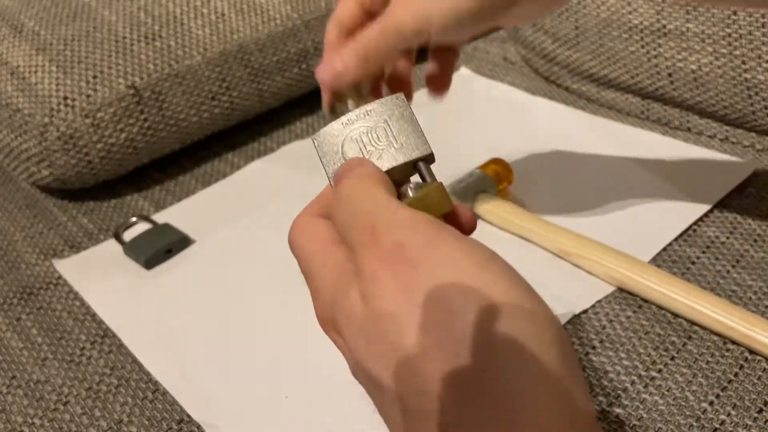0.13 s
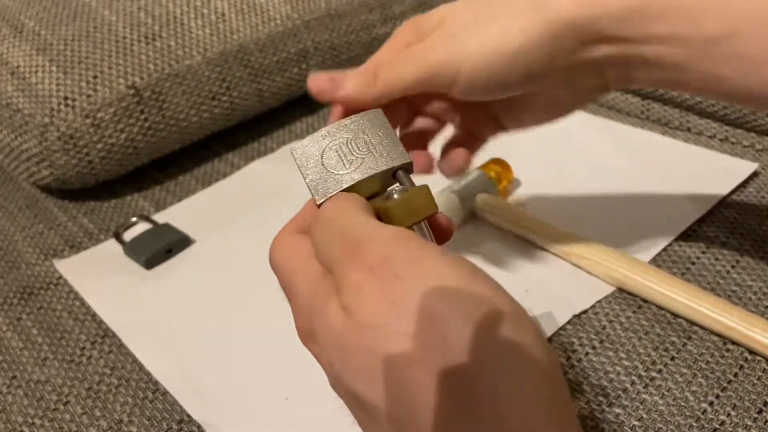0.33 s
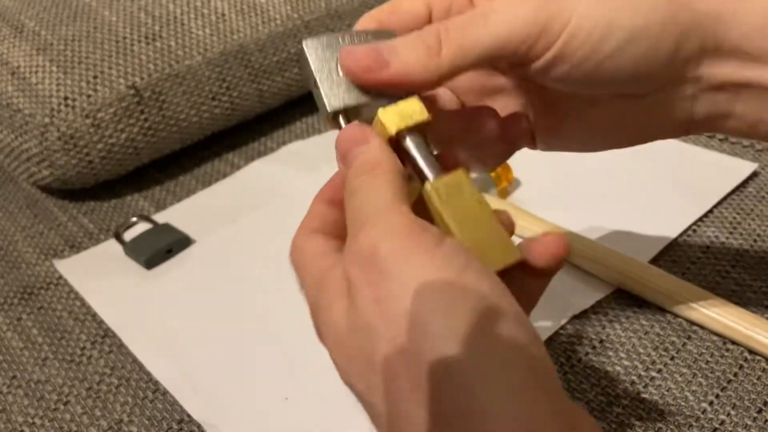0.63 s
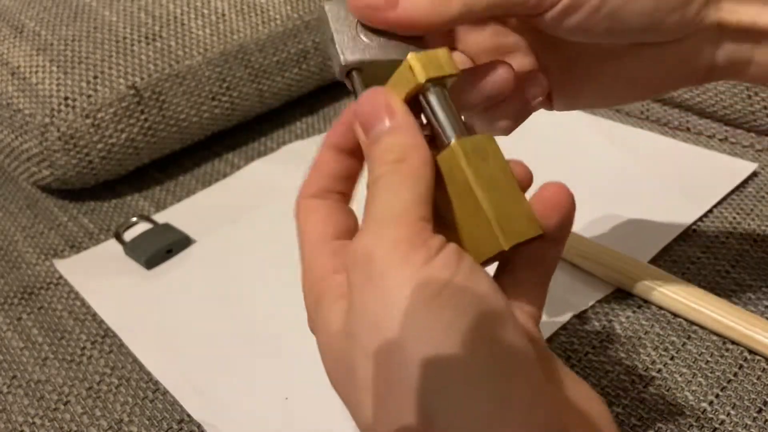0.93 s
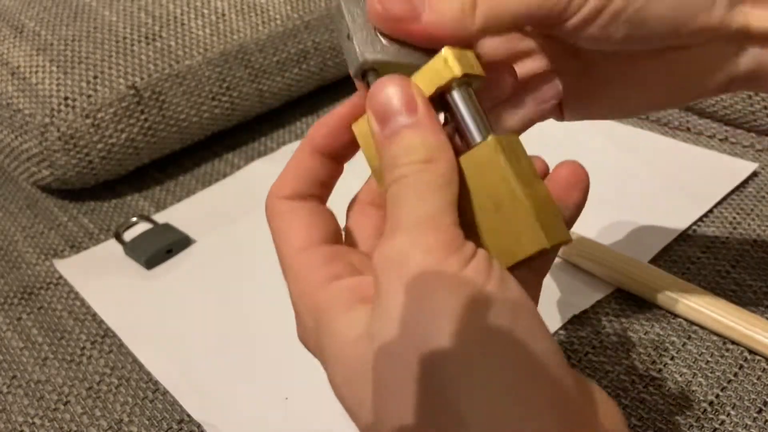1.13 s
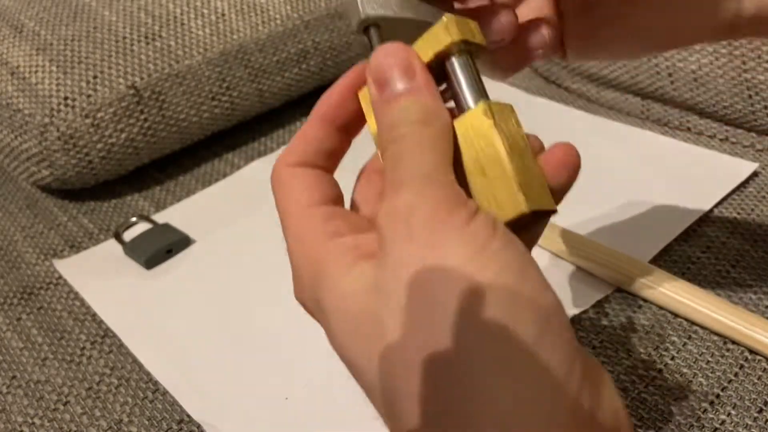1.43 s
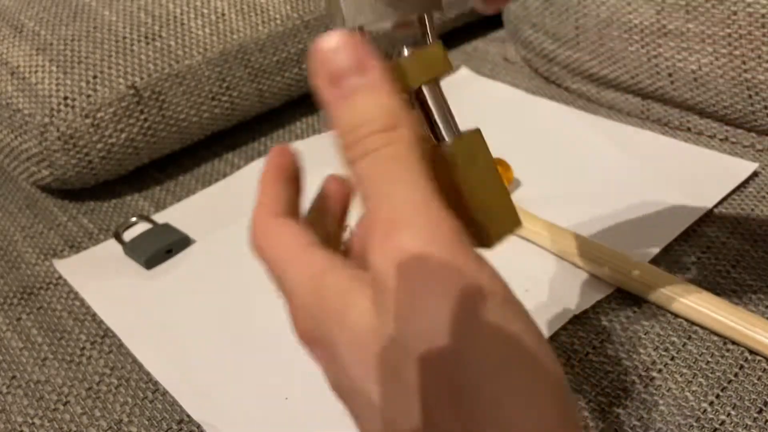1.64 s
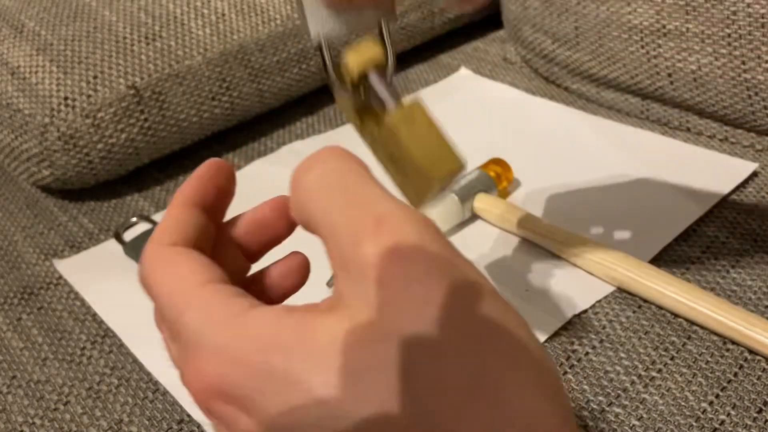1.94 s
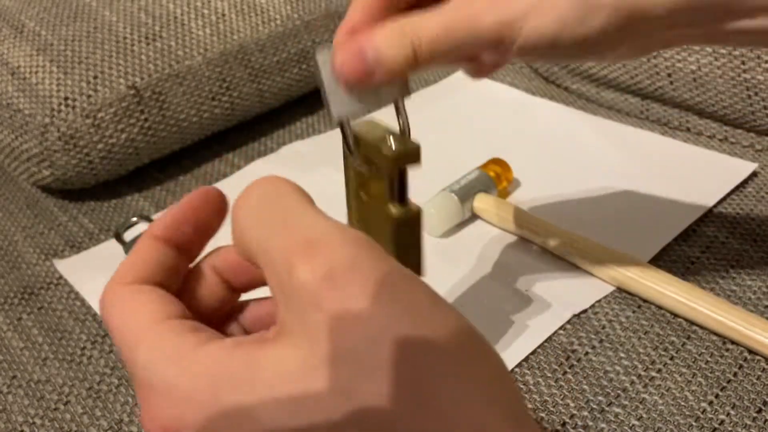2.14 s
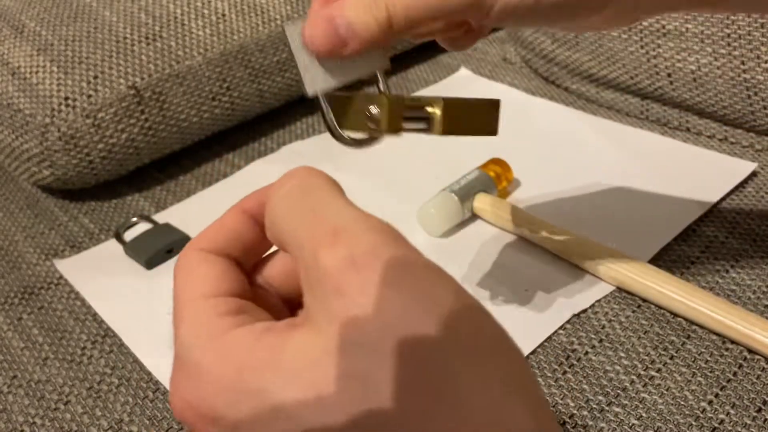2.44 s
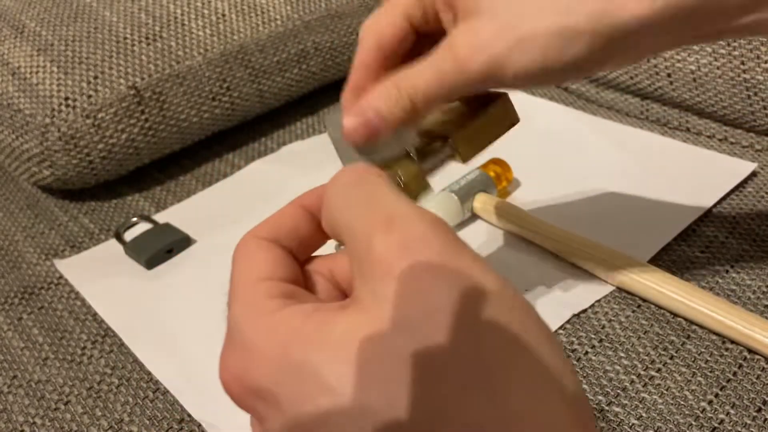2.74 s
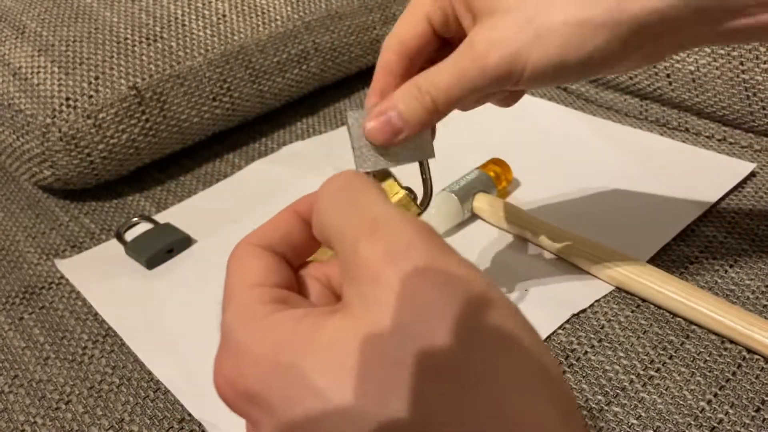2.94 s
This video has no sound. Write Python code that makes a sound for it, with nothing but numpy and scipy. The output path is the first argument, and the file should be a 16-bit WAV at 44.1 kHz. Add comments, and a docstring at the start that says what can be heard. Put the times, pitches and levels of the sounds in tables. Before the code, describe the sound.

Small brass and steel padlocks: a dull padded thud with a thin high metal ring, faint ticks while handled, then bright irregular clacks and fine jostling as they dangle; close stereo microphone, quiet living room.

```python
"""A chain of small brass and steel padlocks is handled over a sofa, close to a stereo microphone in a living room.
First something lands with a dull thud and a thin metal ring: padded knocks, booms and very high modes.
Then the locks tick in the fingers, and later they dangle and clack together over fine metallic jostling.
Each contact is a snap with a short chatter that rings lock bodies and shackles; some add a lower clank.
Grainy rubbing noise, a diffuse room tail and a quiet rumble with hiss and hum lie around the metal."""
import sys
import numpy as np
from scipy import signal
from scipy.fft import rfft, irfft, next_fast_len
from scipy.io import wavfile
from scipy.ndimage import uniform_filter1d, map_coordinates

SR = 44100
rng = np.random.default_rng(int(sys.argv[2]) if len(sys.argv) > 2 else 0)


def unload_wav(signal):
    """Save mono or channel-first audio to the path in sys.argv[1] as 16-bit WAV at rate SR, clipped to [-1, 1]."""
    wavfile.write(
        sys.argv[1],
        SR,
        np.round(np.clip(np.atleast_2d(signal).T, -1, 1) * 32767).astype(np.int16),
    )


N = 136710  # length in samples
T = np.arange(SR // 5) / SR  # time axis of one short sound, in seconds
LEAD_IN_S = .003  # room ahead of a blow, for the onset of its evened spectrum
RING_DRIVE_S = 0.0074  # t60 of the chatter that feeds the lock and clank modes
ROOM_DELAY_S = .004  # the room answers this long after the direct sound


def amp(db):
    """Decibels to gain."""
    return 10 ** (np.asarray(db) / 20)


def unit(x):
    """Scale to rms 1."""
    return x / np.sqrt(np.mean(x ** 2) + 1e-20)


def one_joule(x):
    """Scale to energy 1, the sum of squared samples."""
    return x / np.sqrt(np.sum(x ** 2) + 1e-20)


def along(points, hz):
    """Read a curve of (Hz, value) points on a log frequency axis."""
    f, v = np.transpose(points)
    return np.interp(np.log(hz + 1), np.log(f + 1), v)


def fade(t, t60):
    """Exponential decay that falls 60 dB in t60 seconds."""
    return np.exp(-np.minimum(np.log(1000) * t / np.maximum(t60, 1e-4), 60))


def add(track, s, sound):
    """Mix a sound into the track at s seconds, cut at the end of the track."""
    part = track[..., max(round(s * SR), 0):][..., :sound.shape[-1]]
    part += sound[..., :part.shape[-1]]


def filtered(x, response):
    """Multiply the spectrum of x by a response of frequency."""
    n = x.shape[-1]
    m = next_fast_len(n + SR // 8)
    return irfft(rfft(x, m) * response(np.fft.rfftfreq(m, 1 / SR)), m)[..., :n]


def coloured(x, points, size=4096):
    """Causal minimum-phase filter with the given (Hz, dB) gain, so that an onset stays sharp."""
    gain = amp(along(points, np.fft.rfftfreq(size, 1 / SR)))
    cepstrum = irfft(np.log(gain))
    # folding the cepstrum onto positive time gives minimum phase
    cepstrum[1:size // 2] *= 2
    cepstrum[size // 2 + 1:] = 0
    impulse = irfft(np.exp(rfft(cepstrum)))
    return signal.fftconvolve(x, impulse)[:len(x)]


def evened(x, width_hz, size=2048):
    """A short blow after a brief lead-in, with spectral ripples wider than width_hz evened out."""
    z = rfft(np.pad(x, (round(LEAD_IN_S * SR), 0))[:size])
    bins = max(int(width_hz * size / SR), 1)
    power = abs(uniform_filter1d(abs(z) ** 2, bins))
    return one_joule(irfft(z / np.sqrt(power + 1e-9 * power.max()), size))


def burst(t60):
    """Dying noise of energy 1."""
    return one_joule(rng.standard_normal(len(T)) * fade(T, t60))


def ring(modes, drive_s, detune, scatter_db=3.0):
    """Damped modes fed by a brief chatter; grip and contact point vary them a little."""
    out = np.zeros(len(T))
    for hz, db, t60 in modes:
        mode_hz = hz * (1 + detune * rng.normal())
        pole = fade(1 / SR, t60) * np.exp(2j * np.pi * mode_hz / SR)
        swing = signal.lfilter([1], [1, -pole], burst(drive_s)).real
        out += amp(db + scatter_db * rng.normal()) * one_joule(swing)
    return out


def contacts():
    """Metal strikes metal: a snap and its chatter, with the ring of lock body and shackle."""
    # Each row: start in seconds, contact levels in dB at four frequencies from low to high,
    # body ring in dB, shackle ring in dB, chatter t60 in seconds
    hits = [(0.094, -45.5, -40, -25.5, -25.5, -34, -40.5, 0.009),
            (0.23, 4.5, -5, -15.5, -12, -17, -24.5, 0.0064), (0.2607, 5, 5, -20, 0.5, 17, -11.5, 0.01),
            (0.2787, -6, -13, -22.5, -10.5, 7.5, -21, 0.016), (0.331, -12.5, -26, -24, -7, -20, -48, 0.029),
            (0.4, -20.5, -15, -21.5, -19.5, -17, -34, 0.034), (0.482, -16, -28.5, -44, -34, -27, -51, 0.03),
            (0.5535, -42, -24, -25, -31, -36, -41, 0.0094), (0.57, -20.5, -12, -8, -9, -24.5, -28, 0.0069),
            (0.8852, -32, -32, -29, -34, -19, -57.5, 0.014),
            (1.1043, -32, -41, -36.5, -17, -47.5, -18, 0.004),
            (1.1225, -35.5, -36.5, -31.5, -25, -42.5, -45, 0.0011),
            (1.177, -28.5, -29.5, -23.5, -31, -34.5, -47, 0.0094),
            (1.324, -18, -6, -0.5, 6.5, -5.5, -4, 0.01), (1.331, -41, -33, -7, -19.5, -5, -28.5, 0.014),
            (1.3404, -35, -16.5, -15, -9, 0, -13, 0.0077), (1.5398, -17, -16, -27.5, -23.5, -10, -30, 0.12),
            (1.554, -27, -12, 4, -2.5, -22, 9, 0.0079), (1.7478, -13.5, -6, 6.5, -11.5, 12, 0, 0.021),
            (1.751, -4, -2, -2.5, -4.5, 5, -19.5, 0.011), (1.7568, -10, -12, -6.5, 2.5, 13.5, 2.5, 0.012),
            (1.7938, -29, -14, -11, -13.5, -21, -11.5, 0.0095), (1.8043, -8, 5.5, 9, 10, 17, 22, 0.0055),
            (1.84, -25, -18, -7, -4.5, -1, 1.5, 0.0036), (2.0187, -7.5, -9, -1.5, -4, 5, 8.5, 0.016),
            (2.0226, -31, -11.5, -4.5, -0.5, -11, 4, 0.0034),
            (2.0341, -13, -27, -10.5, -15, -9, -3, 0.0071),
            (2.061, -14.5, -8.5, -8.5, -12, -9, -15.5, 0.012), (2.073, -43.5, -26, -25, 3.5, 6, 4, 0.0037),
            (2.0789, -11, -16, 0, -3.5, 16.5, 8.5, 0.015), (2.2089, -26.5, -9, -1.5, 5, -13, -7, 0.0054),
            (2.259, -7, 0, -2.5, -11, 4.5, 6, 0.018), (2.3049, -1.5, -1.5, -3, -6, 2, 10.5, 0.007),
            (2.3464, -40.5, -12.5, -1.5, 0, -13.5, 4.5, 0.008), (2.4066, -8, 2, -2, -4.5, 5.5, 17, 0.01),
            (2.444, -9, 4.5, -2.5, 2, 15.5, -16, 0.026),
            (2.5243, -20, -20.5, -1.5, -5.5, -15.5, 4.5, 0.0045),
            (2.567, -7, -8, -8.5, -16.5, -10, 5, 0.036), (2.574, -22, -19, -2.5, -13.5, 9.5, 6.5, 0.022),
            (2.596, -3.5, -1, 10, -1, 3.5, 21.5, 0.014), (2.7222, -5.5, 1.5, -5.5, -15, 2, 4, 0.0064),
            (2.726, -31, -37, -18.5, -12, -21, -20, 0.036), (2.7364, -27.5, -3, -17, -13.5, 2, -24, 0.0151),
            (2.7738, -41, -40.5, -11, -8.5, -3, -20, 0.009),
            (2.8048, -19, -7.5, -14.5, -6, 7.5, -3, 0.0293), (2.8082, -19.5, -5.5, -9, -16, -29, -4, 0.024),
            (2.8484, -13.5, -14, -3.5, -2.5, -18.5, -11, 0.0056),
            (2.881, -12.5, -20.5, -28, -21.5, -34, -36, 0.0175),
            (3.024, -25.5, -28, -22, -28, -14, -11, 0.00463)]
    # Where the four levels hold, in Hz
    level_hz = [1100, 3200, 8000, 13000]
    # Lowest and highest corner of the contact colour, in Hz
    edges_hz = (200, 15300)
    # Lock body modes. Each row: frequency in Hz, energy in dB, t60 in seconds
    body_modes = [(3085, -39, .03), (4550, -30, .012), (4780, -23, .014), (4920, -19, .016),
                  (4845, -39, .1), (5015, -35, .07), (5230, -27, .025), (5265, -39, .13)]
    # Shackle modes. Each row: frequency in Hz, energy in dB, t60 in seconds
    shackle_modes = [(8650, -28, .012), (13110, -22, .012), (13175, -31, .22), (13260, -35, .12)]
    bass_db, top_edge_db = -14, 2  # edge corners, against the lowest and highest level
    snap_t60_s, snap_db = .002, 2  # the first snap, its energy against the chatter
    rise_s = .00018  # time constant of the attack
    bass_hz, edge_hz = edges_hz
    for s, low, mid, treble, top, body_db, shackle_db, chatter_s in hits:
        levels = zip(level_hz, (low, mid, treble, top))
        colour = [(bass_hz, low + bass_db), *levels, (edge_hz, top + top_edge_db)]
        snap = amp(snap_db) * burst(snap_t60_s)
        blow = (snap + burst(chatter_s)) * (1 - np.exp(-T / rise_s))
        body = ring(body_modes, RING_DRIVE_S, detune=.006, scatter_db=2)
        shackle = ring(shackle_modes, RING_DRIVE_S, detune=.0015)
        sound = np.zeros(len(T))
        add(sound, 0, coloured(evened(blow, width_hz=700), colour))
        add(sound, LEAD_IN_S, amp(body_db) * body + amp(shackle_db) * shackle)
        yield s - LEAD_IN_S, sound


def clanks():
    """A lock drops to the end of its shackle's play and is caught: a lower, short set of modes."""
    # Each row: start in seconds, level in dB, pitch ratio
    drops = [(1.7481, -15.5, 0.89), (1.754, -17, 1.06), (2.257, -21, 1.22), (2.5678, -28, 0.97)]
    # Each row: frequency in Hz at pitch ratio 1, energy in dB, t60 in seconds
    clank_modes = [(945, 0, .016), (2643, -5, .03), (3731, -5, .02)]
    for s, db, ratio in drops:
        modes = [(ratio * hz, level, t60) for hz, level, t60 in clank_modes]
        yield s, amp(db) * ring(modes, RING_DRIVE_S, detune=.005, scatter_db=0.5)


def pings():
    """Light touches ring only a thin metal part: a very high shimmer over a lower ring."""
    # Each row: start in seconds, high ring in dB, lower ring in dB
    touches = [(.093, -15, -36), (.147, -30, -37), (.197, -24, -36), (.241, -6, -42), (.248, 2, -42),
               (.261, 3, -42), (.274, 3, -38), (.287, 0, -42), (.334, -14, -42), (.48, -30, -50),
               (.668, -22, -52)]
    # High modes. Each row: frequency in Hz, energy in dB, t60 in seconds
    high_modes = [(14365, 0, .045), (14660, -7, .025), (15060, -13, .06), (14400, -19, .2)]
    # Lower modes. Each row: frequency in Hz, energy in dB, t60 in seconds
    low_modes = [(5265, -2, .14), (5150, -4, .05), (10140, -6, .15)]
    drive_s = 0.087  # t60 of the chatter that feeds the modes
    for s, high_db, low_db in touches:
        high = ring(high_modes, drive_s, detune=0.0003)
        low = ring(low_modes, drive_s, detune=0.0025)
        yield s, amp(high_db) * high + amp(low_db) * low


def thuds():
    """Padded blows: a knock of filtered noise over a hollow resonance and a low boom."""
    # Each row: start in seconds, boom pitch in Hz, boom level in dB, hollow level in dB, knock level in dB
    blows = [(.2285, 103.7, -11.5, -7, 5), (0.2332, 103.9, 2.5, 3.5, -13.5), (.2608, 99, -16.5, -7, 0.5),
             (0.268, 96, -2, 2.5, -11), (.281, 102, -19, -10.5, -7), (.293, 100, -21, -13, -13.5),
             (.332, 101, -19, -20.5, -21), (.396, 98, -29.5, -24, -13), (.668, 69, -48, -33.5, -26),
             (1.122, 84.5, -26.5, -33, -41.5), (1.176, 73.5, -27, -28.5, -55),
             (1.334, 66.7, -15.5, -26, -43.5), (1.748, 110, -27, -26, -26), (1.805, 68, -17, -39, -38),
             (2.02, 70, -27.5, -24, -52), (2.08, 112, -26, -32, -59), (2.26, 66.2, -17, -33.5, -36),
             (2.305, 90.4, -20, -24, -37), (2.58, 69.8, -23.5, -30, -52), (2.85, 65.7, -25, -37.5, -37)]
    # Boom modes. Each row: ratio to the boom pitch, energy in dB, t60 in seconds
    boom_modes = [(.72, -8, .1), (1, -2, .1)]
    # Hollow resonance. Each row: frequency in Hz, energy in dB, t60 in seconds
    hollow_modes = [(133, -14, .18), (165, -6, .03), (191, -6, .17), (215, -1, .04)]
    # Tone of the knock. Each row: frequency in Hz, relative gain in dB
    knock_colour = [(50, -26.5), (120, -16), (300, -6), (500, 5.5), (720, 5), (1100, -6), (1400, -12),
                    (2000, -7.5), (5000, -29), (12000, -44)]
    drive_s, knock_t60_s = 0.021, 0.019  # t60 of the feed to the modes and of the knock noise
    for s, boom_hz, boom_db, hollow_db, knock_db in blows:
        modes = [(boom_hz * ratio, db, t60) for ratio, db, t60 in boom_modes]
        boom = ring(modes, drive_s, detune=0.0039)
        hollow = ring(hollow_modes, drive_s, detune=0.013, scatter_db=0.5)
        knock = one_joule(coloured(evened(burst(knock_t60_s), width_hz=250), knock_colour))
        sound = np.zeros(len(T))
        add(sound, 0, amp(knock_db) * knock)
        add(sound, LEAD_IN_S, amp(boom_db) * boom + amp(hollow_db) * hollow)
        yield s - LEAD_IN_S, sound


def jostling():
    """Tiny random scrapes of the shackles sliding in each other while the locks hang free."""
    # Start and end of the dangling, in seconds
    dangle_s = (2.02, 2.9)
    # Tone of the scrapes. Each row: frequency in Hz, gain in dB
    scrape_colour = [(200, -28), (1200, -7.5), (2500, 7.5), (5000, 2), (7000, 6), (13000, -3.5)]
    rate, t60_s = 70, 0.0044  # scrapes a second, length of each in seconds
    level_db, spread_db = -30, 2  # energy before the colour, and its random spread
    track = np.zeros(N)
    start, end = dangle_s
    for s in np.arange(start, end, 1 / rate):
        jitter_s = rng.uniform(-1.1, 1) / rate
        gain = amp(level_db + spread_db * rng.normal())
        add(track, s + jitter_s, gain * burst(t60_s))
    return coloured(track, scrape_colour)


def rubbing():
    """Friction of fingers, metal and cloth: coloured noise with a random grain in its level."""
    # Each row: time in seconds, level in dB
    strokes = [(0, -84.5), (.1, -70.5), (.19, -70), (.222, -45.5), (.235, -37.5), (.28, -36.5), (.315, -45),
               (.37, -48), (.45, -59), (.54, -65.5), (.65, -58.5), (.672, -55), (.7, -65), (1.03, -85.5),
               (1.11, -59), (1.19, -74.5), (1.28, -80), (1.72, -75), (1.745, -55.5), (1.77, -58.5),
               (1.98, -72), (2.2, -59), (2.7, -58.5), (2.8, -54), (2.95, -66), (3.0, -57.5), (3.05, -72.5),
               (3.1, -73.5)]
    # Tone of the friction. Each row: frequency in Hz, relative gain in dB
    friction_colour = [(40, -8), (110, 6), (600, -5.5), (1500, -9.5), (3500, -11.5), (5000, -5.5),
                       (6500, -13), (9000, -9), (12000, -9.5), (14500, -15), (16000, -8.5)]
    grain_db, grain_rate = 3.5, 250  # depth, grains a second
    t = np.arange(N) / SR
    grain = map_coordinates(rng.standard_normal(N // 8), [t * grain_rate], order=1)
    grainy = rng.standard_normal(N) * amp(grain_db * grain)
    noise = filtered(grainy, lambda hz: amp(along(friction_colour, hz)))
    return unit(noise) * amp(np.interp(t, *np.transpose(strokes)))


def ports(x):
    """Direct sound reaches the two microphone ports with different level and phase."""
    # Each row: frequency in Hz, left minus right in dB
    balance = [(150, -2.2), (550, 3), (1200, -6), (3000, -4.5), (4900, -12.5), (6500, 1), (14000, 0)]
    # Each row: frequency in Hz, phase by which left leads in radians
    lead = [(250, 0), (1500, -.5), (5000, -.7), (6500, 0), (8800, 3), (10500, 4.4), (12300, 6.2),
            (15200, 9.2)]

    def response(hz):
        # each side takes half of the difference; total power stays even
        half = amp(along(balance, hz) / 2) * np.exp(.5j * along(lead, hz))
        pair = np.array([half, 1 / half])
        return pair / np.sqrt(np.mean(abs(pair) ** 2, axis=0))
    return filtered(x, response)


def diffuse(pair, colour):
    """Two unrelated signals become a coloured field whose left-right likeness varies with frequency."""
    # Each row: frequency in Hz, left-right likeness from 0 to 1
    likeness = [(60, 0.73), (150, 0.87), (380, 0.09), (950, 0.038), (6000, 0.48)]

    def mid_side(hz):
        turn = np.arccos(np.clip(along(likeness, hz), -1, 1)) / 2
        return amp(along(colour, hz)) * [np.cos(turn), np.sin(turn)]
    mid, side = filtered(pair, mid_side)
    return np.array([mid + side, mid - side])


def room(x, size=256):
    """Convolve with a fresh diffuse noise tail; each frequency dies at its own speed."""
    # Each row: frequency in Hz, t60 in seconds
    decay = [(100, 0.66), (500, .36), (1500, 0.36), (5000, 0.44), (9000, 0.26), (14000, 0.34)]
    # Each row: frequency in Hz, tail level in dB
    tail_level = [(100, -6.5), (500, -7.5), (1500, -5.5), (4500, -11), (7000, -13), (9500, -37),
                  (12000, -12), (15000, -30.5)]
    hz, t, z = signal.stft(rng.standard_normal((2, SR // 2)), SR, nperseg=size)
    t60 = np.maximum(along(decay, hz), .02)[:, None]
    even_energy = np.sqrt(2 * np.log(1000) / (t60 * SR))  # slow and fast decays carry alike energy
    tail = signal.istft(z * fade(t, t60) * even_energy, SR, nperseg=size)[1]
    return signal.fftconvolve(x[None], diffuse(tail, tail_level), axes=1)


def room_tone():
    """Quiet rumble and hiss from diffuse coloured noise, with a faint sine hum."""
    # Each row: frequency in Hz, relative gain in dB
    floor_colour = [(15, -39), (25, 8.5), (64, 12), (170, -1.5), (301, 0), (503, -7.5), (624, -14.5),
                    (1610, -25), (2550, -38), (5430, -27.5), (9320, -41.5), (12500, -19), (16000, -37.5)]
    floor_db, hum_hz, hum_db = -63, 489, -77.5  # levels are rms ahead of the recorder
    hum = np.sin(2 * np.pi * hum_hz * np.arange(N) / SR)
    noise = diffuse(rng.standard_normal((2, N)), floor_colour)
    return amp(floor_db) * unit(noise) + amp(hum_db) * unit(hum)


def scene():
    """All sounds, direct and through the room, over the room tone."""
    direct, wet = np.zeros(N), np.zeros((2, N))
    for s, sound in [*contacts(), *clanks(), *pings(), *thuds()]:
        add(direct, s, sound)
        add(wet, s + ROOM_DELAY_S, room(sound))
    handling = rubbing() + jostling()
    add(wet, ROOM_DELAY_S, room(handling))
    return ports(direct + handling) + wet + room_tone()


def record(dry):
    """The recorder rolls off and stops at its band limit."""
    # Each row: frequency in Hz, gain in dB
    mic = [(20, -21.5), (40, -6), (60, -7), (14800, -2), (15700, -19), (16500, -19.5)]
    cut_hz = 16900
    return filtered(dry, lambda hz: amp(along(mic, hz)) * (hz < cut_hz))


dry = scene()
out = record(dry)
unload_wav(out)
```